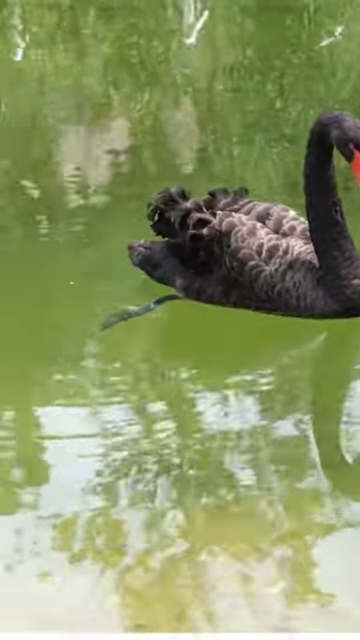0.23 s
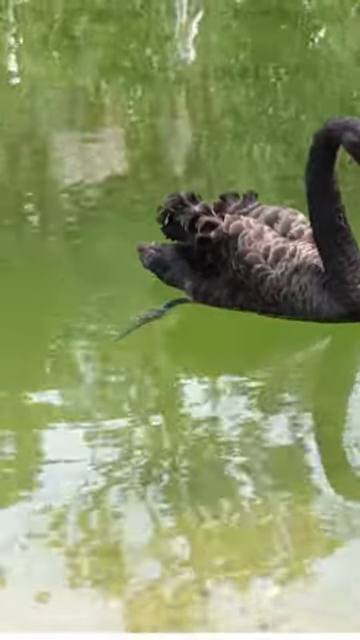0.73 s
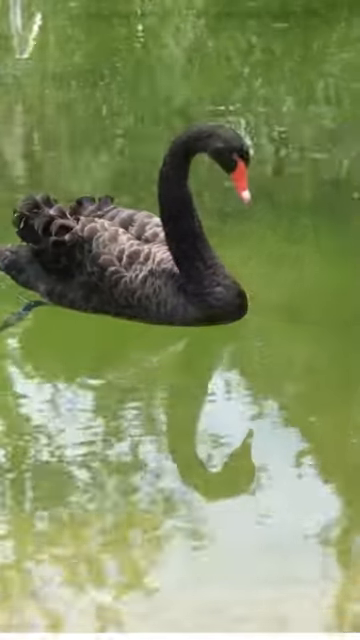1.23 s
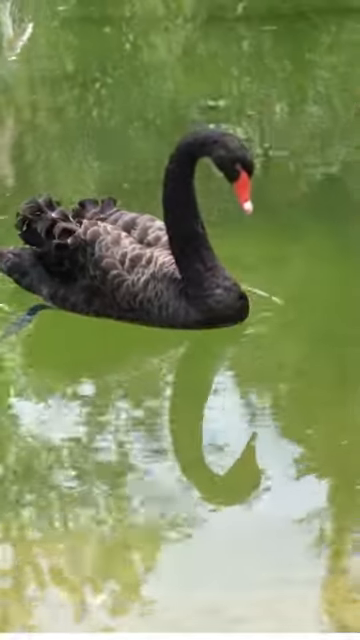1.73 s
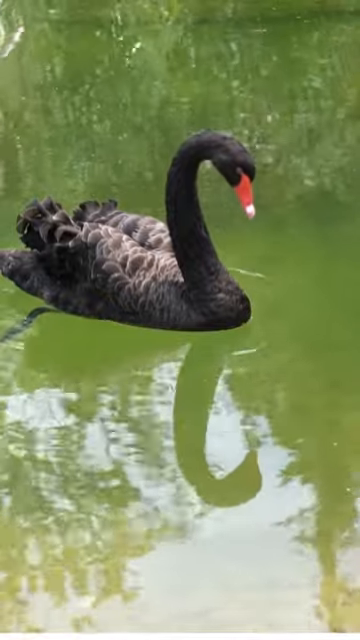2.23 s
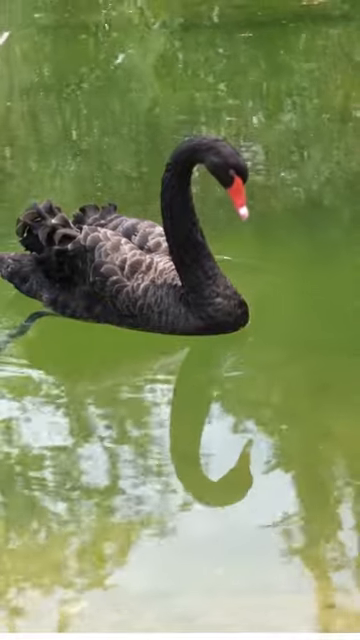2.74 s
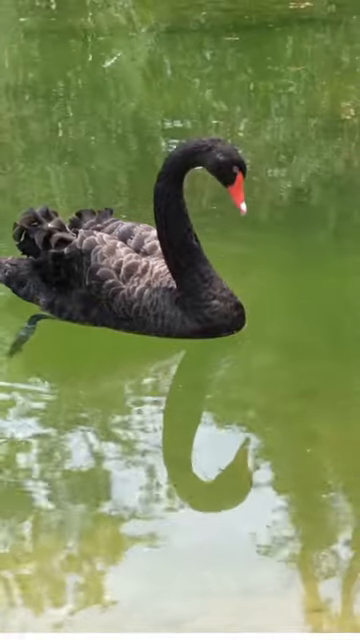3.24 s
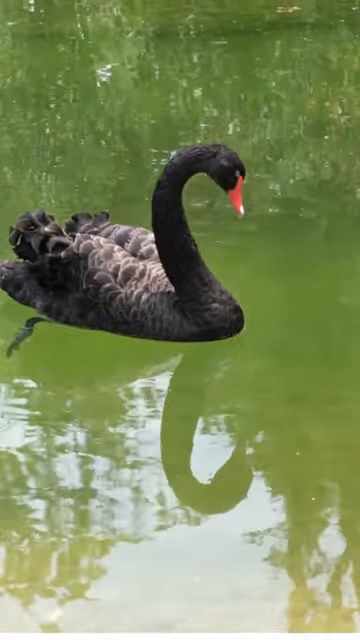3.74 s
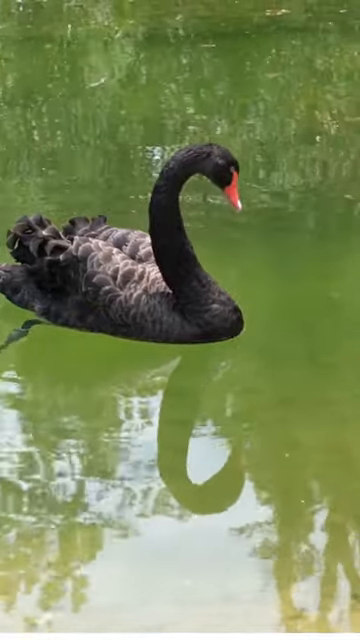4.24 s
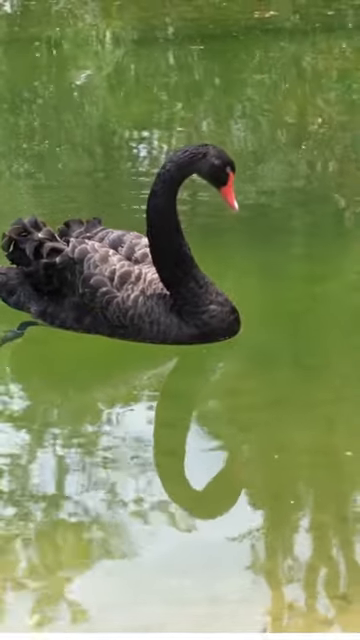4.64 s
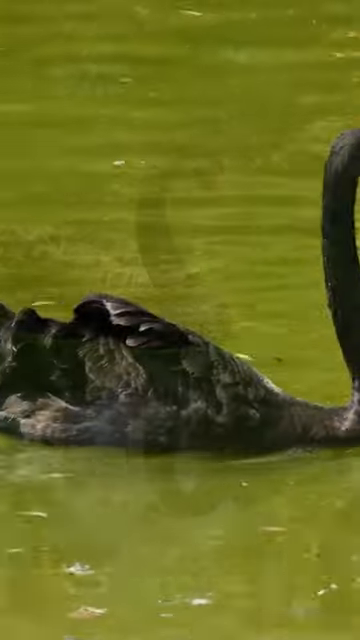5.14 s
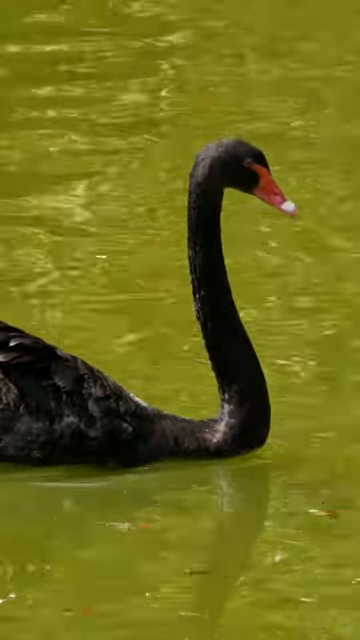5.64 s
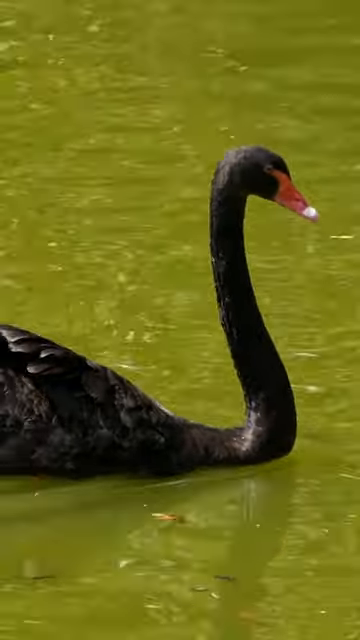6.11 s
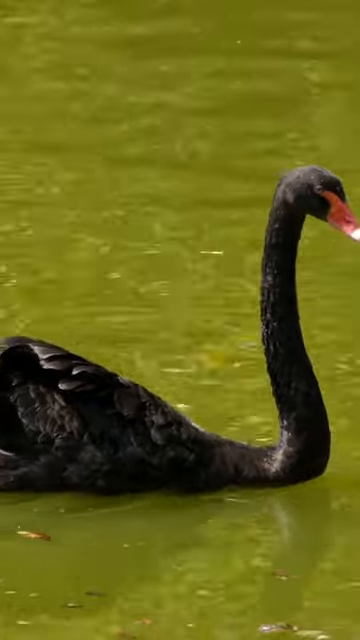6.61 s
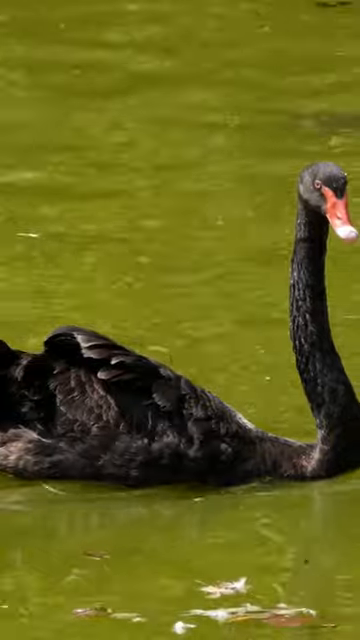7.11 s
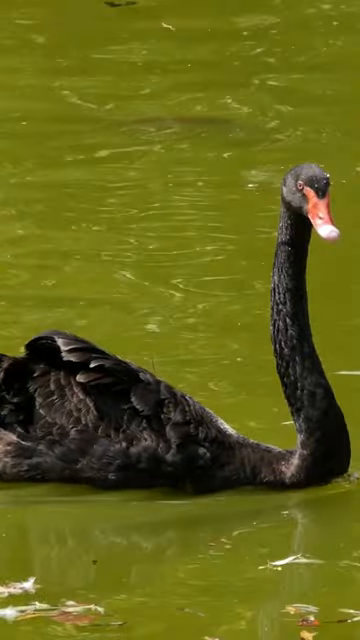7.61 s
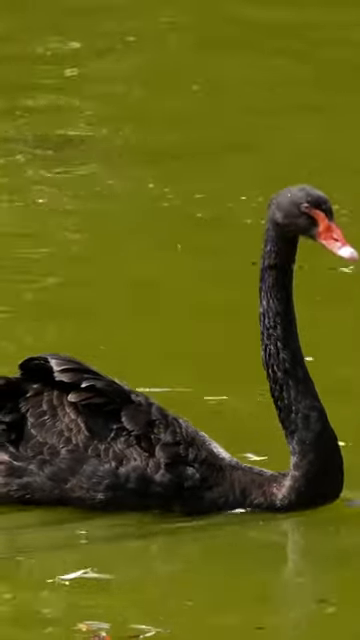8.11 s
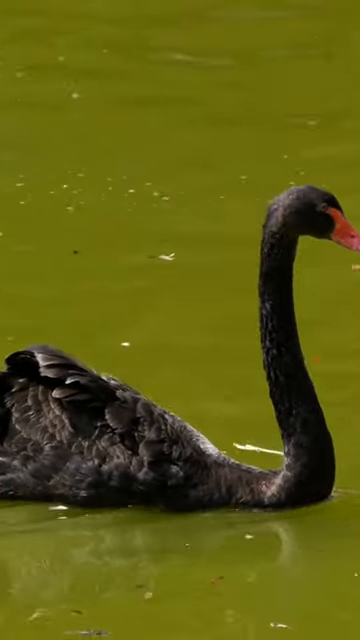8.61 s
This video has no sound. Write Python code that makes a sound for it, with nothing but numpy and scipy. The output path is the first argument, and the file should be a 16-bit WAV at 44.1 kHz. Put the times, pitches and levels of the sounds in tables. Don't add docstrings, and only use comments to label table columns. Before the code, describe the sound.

Faint outdoor hum and tiny water ticks, then a short, brassy swan call close by, nearly dry. A thin, far whistle passes, and feathers brush softly. A second, rougher call comes, followed by a quiet two-note answer from another bird farther off. After a pause, a third bugle sounds. Each call bends down and finishes on a lower note, its start slightly overloaded on a small microphone.

```python
import sys
import numpy as np
from scipy import signal
from scipy.io import wavfile
from scipy.ndimage import uniform_filter1d

SR = 44100
rng = np.random.default_rng(int(sys.argv[2]) if len(sys.argv) > 2 else 0)


def natural_amplitude(level_db):
    exponent = np.asarray(level_db, float) / 20
    return 10 ** exponent


def bounce(signal):
    frames = np.transpose(np.atleast_2d(signal))
    limited = np.clip(frames, -1, 1)
    pcm = np.round(limited * 32767).astype(np.int16)
    wavfile.write(sys.argv[1], SR, pcm)


N = 390726

# share of the time to lock, beat rate in Hz,
# its level against the first membrane in dB, level of the double-beat tone in dB.
MEMBRANE_BEATS = [(-.13, 103.7, 24, -4), (0, 103.4, 9.5, -4), (.1, 106.4, -9, -4), (.36, 103.4, -14, .3),
                  (.56, 110.8, 3.5, -23), (.8, 114, -12, -24.5), (1.11, 111.4, -39.5, -58)]
# frequency in Hz, gain in dB.
NEAR_PIPE = [(1000, -3), (1250, 3), (1600, -5.5), (2350, -0.5), (2750, -1.5), (3300, 2), (3850, -2),
             (4600, -9.5), (5200, 2), (6000, -8)]


def evened(x):
    return x / np.sqrt(np.mean(x ** 2) + 1e-20)


def read(points, hz):
    f, value = np.transpose(points)
    return np.interp(np.log(hz + 1), np.log(f + 1), value)


def curves(rows, t):
    s, *columns = np.transpose(rows)
    return [np.interp(t, s, c) for c in columns]


def add(mix, s, sound):
    part = mix[round(s * SR):][:len(sound)]
    part += sound[:len(part)]


def resonate(x, hz, width):
    return signal.lfilter(*signal.iirpeak(hz, hz / width, SR), x)


def smooth_noise(count, window):
    once = uniform_filter1d(rng.standard_normal(count), window)
    return evened(uniform_filter1d(once, window))


def voice(hz, effort_db, bright_db, beats, pipe, throat, turn_db=0, first_turn=0, fan=0.67,
          pull=0.13, pull_turn=.36, double_turn=0.083, triple=0.42, spread=0.88, back=.7,
          rasp=0.22, shiver=.2, wobble=0.0011, stumble=.05, pressed_db=18):
    # frequency in Hz, level in dB against partial 2.
    bill_colour = [(4400, -0.5), (4800, -10), (5200, -29.5), (5550, -4.5), (5700, -24), (5850, -23.5),
                   (6500, -50), (6800, -62.5), (7000, -46.5), (7400, -39), (7780, -36.5), (7950, -63.5),
                   (8150, -39), (8600, -68.5)]
    throb, double_throb = .65, .6
    notch_hz, notch_width_hz, notch_db = 4530, 42, -17
    count, levels_db = len(hz), []
    beat_hz, second_db, double_db = beats
    drift = [evened(uniform_filter1d(d, 300)) for d in rng.standard_normal((2, count))]
    flutter = smooth_noise(count, 80)
    hz = uniform_filter1d(hz, 300) * (1 + wobble * drift[0])

    second = natural_amplitude(second_db)
    double = natural_amplitude(double_db) * np.exp(2j * np.pi * double_turn)
    beat = 2 * np.pi * np.cumsum(beat_hz * (1 + stumble * drift[1])) / SR + 2 * np.pi * first_turn
    around = np.exp(2j * np.pi * np.arange(32) / 32)[:, None]
    slow = slice(0, None, 16)
    joint = 1 + second[slow] * around + double[slow] * around ** 2
    joint = joint + triple * double[slow] ** 2 * around ** 3
    fight = np.minimum(second, 1 / second)
    pair = np.minimum(abs(double), 1)
    strain = np.maximum(fight, pair)

    angle = 2 * np.pi * np.cumsum(hz) / SR + pull * fight * np.sin(beat + 2 * np.pi * pull_turn)
    angle += shiver * strain * smooth_noise(count, 160)

    out = np.zeros(count)
    for k in range(1, 9):
        n = np.arange(3 * k + 1)[:, None]
        tone_hz = k * hz[slow] + n * beat_hz[slow]
        tones = np.fft.fft(joint ** k, axis=0)[:len(n)] * natural_amplitude(read(pipe, tone_hz) * (k < 5))
        power = abs(tones) ** 2
        middle = (n * power).sum(0) / power.sum(0)
        if k > 1:
            sweep = np.exp(1j * spread / k * (n - middle) ** 2)
            tones = tones * (1 / sweep + back * (-1.) ** n * sweep)
        tones = tones / np.linalg.norm(tones, axis=0) * natural_amplitude(read(bill_colour, tone_hz) * (k > 4))
        tones = np.repeat(tones, 16, axis=1)[:, :count]
        partial = (tones * np.exp(1j * n * beat)).sum(0) * np.exp(1j * (k * angle + 0.71 * k * k))
        if k > 1:
            single_swell = throb * fight * (1 - pair) * np.cos(beat)
            partial *= 1 + single_swell + double_throb * pair * np.cos(2 * beat)
        centre_hz = k * hz + np.repeat(middle, 16)[:count] * beat_hz
        pocket_db = notch_db / (1 + (2 * (centre_hz - notch_hz) / notch_width_hz) ** 2)
        levels_db.append(effort_db + bright_db * (k - 1) ** fan + read(throat, centre_hz) + pocket_db)
        if k < 5:
            db = turn_db * (k > 3) + levels_db[k - 1]
        else:
            db = levels_db[1] + pressed_db * strain * (k > 5)
        out -= natural_amplitude(uniform_filter1d(db, 200)) * np.sqrt(2) * partial.real
    out *= 1 + rasp * strain * flutter
    return out * signal.windows.tukey(count, 600 / count)


def call(k):
    # onset in seconds, membranes lock in seconds, note closes in seconds,
    # turn of the bill in dB on partial 4, extra strength of the second membrane in dB.
    timings = [
        (2.275, 2.365, 2.575, 3.5, -1),
        (5.285, 5.405, 5.59, -.4, 5.5),
        (8.022, 8.135, 8.31, -5.5, -1),
    ]
    # time in seconds, effort in dB, brightness in dB per partial.
    breath = [
        [(2.255, -56, -2), (2.263, -36.5, -13), (2.274, -19, -.6), (2.342, -20.5, -0.83), (2.4, -31, 2),
         (2.452, -27, 1), (2.514, -32, 2.5), (2.553, -28.5, -2.5), (2.582, -43, -25)],
        [(5.265, -54, -5.5), (5.274, -36, -10), (5.288, -18, -1.5), (5.36, -20.5, -1.5), (5.416, -30, 0),
         (5.462, -23.5, -1), (5.53, -28.5, 0), (5.57, -28, -2.5), (5.597, -45.5, -37)],
        [(8.0, -58.5, -2.5), (8.011, -41, -11), (8.024, -18, 0), (8.105, -20, 2.5), (8.162, -29, 1.5),
         (8.21, -24.5, 2.5), (8.262, -27, 1), (8.291, -27.5, -1), (8.317, -51, -23.5)],
    ]
    # frequency in Hz, gain in dB.
    near_throat = [(1100, -0.5), (2130, -5), (2330, 0.5), (2700, -2.5), (3250, 2.5), (3750, 0), (4400, -7),
                   (5100, -9.5)]
    start_hz, hold_hz, sag_hz, sag_s = 1240.3, 1166, 150, .043
    overshoot_hz, overshoot_share = 54.7, 0.083
    onset, lock, close, turn_db, extra_db = timings[k]
    t = np.arange(breath[k][0][0], breath[k][-1][0], 1 / SR)
    share = (t - onset) / (lock - onset)
    hz = hold_hz + (start_hz - hold_hz) * np.maximum(1 - share, 0) - sag_hz * np.exp((t - close) / sag_s)
    hz += overshoot_hz * np.exp(-np.maximum(share + overshoot_share, 0) / overshoot_share)
    beat_hz, second_db, double_db = curves(MEMBRANE_BEATS, share)
    beats = beat_hz, second_db + extra_db, double_db
    return t[0], voice(hz, *curves(breath[k], t), beats, NEAR_PIPE, near_throat, turn_db, first_turn=.48)


def hiccup(s, length, db, bright_db):
    # share of the hiccup's length, effort in dB, brightness in dB per partial.
    hiccup_breath = [(0, -2, -14.5), (.2, 0, 0), (.45, 0, 2), (.74, -7.5, 2.5), (.87, -11, -13),
                     (1.099, -43, -26)]
    # frequency in Hz, gain in dB.
    narrow_throat = [(900, -1.2), (1860, -7.5), (2790, -14.5), (3700, -1)]
    share = np.arange(0, hiccup_breath[-1][0] * length, 1 / SR) / length
    effort_db, tilt_db = curves(hiccup_breath, share)
    hz = 950 - 86 * share ** 1.53
    locked = curves(MEMBRANE_BEATS[-1:], share)
    return s, voice(hz, db + effort_db, bright_db + tilt_db, locked, NEAR_PIPE, narrow_throat)


def answer():
    # time in seconds, pitch in Hz, effort in dB, brightness in dB per partial.
    soft_notes = [
        [(6.25, 1384, -60, -3), (6.264, 1383, -43, 0), (6.288, 1335, -40.5, 0), (6.312, 1275, -46.5, 1.5),
         (6.34, 1245, -57, -4), (6.362, 1286, -54, -14)],
        [(6.368, 1217, -54, -7), (6.384, 1227, -46.5, -2), (6.405, 1190, -46, -1), (6.42, 1192, -48.5, -9),
         (6.446, 1190, -59.5, -9), (6.52, 1195, -78, -3)],
    ]
    # time in seconds, beat rate in Hz, second membrane in dB, double-beat tone in dB.
    soft_beats = [(6.25, 106, 18, 2.5), (6.275, 107, 2, -23), (6.3, 109, -26, 0.5), (6.36, 105.5, 11, .1),
                  (6.37, 108, 1, -22), (6.4, 110, -5, -31), (6.425, 110, -14.5, -32),
                  (6.45, 110, -42.5, -61.5)]
    # frequency in Hz, gain in dB.
    far_pipe = [(1000, 10), (1350, -1), (1800, -12), (2400, -11), (3000, 3), (3600, -6), (4350, 12),
                (4750, -23), (5500, -8)]
    # frequency in Hz, gain in dB.
    far_throat = [(1300, 1), (2500, -18.5), (2900, -13), (3750, -18.5), (4300, 0), (4900, -28), (5600, -39)]
    t = np.arange(soft_notes[0][0][0], soft_notes[1][-1][0], 1 / SR)
    pitch_and_breath = curves([*soft_notes[0], *soft_notes[1]], t)
    return t[0], voice(*pitch_and_breath, curves(soft_beats, t), far_pipe, far_throat,
                       pull=0.77, back=0.39, shiver=.06, rasp=.15)


def puff(s, db, lead, hiss=0.39):
    # frequency in Hz, width in Hz, gain in dB.
    windpipe = [(1400, 147.8, 11.5), (2620, 490, 2), (4000, 370, -4), (5460, 390, -8.5), (7800, 960, -10.5)]
    t = np.arange(-.2, .1, 1 / SR)
    air = rng.standard_normal(len(t))
    tube = sum(natural_amplitude(g) * resonate(resonate(air, f, w), f, w) for f, w, g in windpipe)
    air = evened(tube + hiss * resonate(resonate(air, 4000, 4500), 3500, 4500))
    return s + t[0], air * natural_amplitude(db + np.where(t < 0, 20 * t / lead, -600 * t))


def shore(x, t60=0.22):
    t = np.arange(SR // 2) / SR
    sparse = rng.choice([-1., 1.], len(t)) * (rng.random(len(t)) < 2000 / SR)
    taps = sparse * natural_amplitude(-60 * t / t60) * (t > .008)
    return signal.fftconvolve(x, taps / np.linalg.norm(taps))[:N]


def tick(hz, snap_db, ring_s=0.001):
    t = np.arange(-.002, .006, 1 / SR)
    shape = np.exp(-abs(t) / np.where(t < 0, .0004, ring_s))
    snap = evened(resonate(resonate(rng.standard_normal(len(t)), 8200, 6900), 8000, 9000))
    return shape * (np.cos(2 * np.pi * hz * t) + 1.1 * natural_amplitude(snap_db) * snap)


def bubble(s, length, hz, octaves, db, bend=1.7, top=0.28):
    u = np.arange(0, length, 1 / SR) / length
    level_db = db - np.where(u < top, 19 * (1 - u / top), 17 * (u - top) / (1 - top))
    pitch_hz = hz * 2 ** (octaves * u ** bend)
    return s, natural_amplitude(level_db) * np.sqrt(2) * np.sin(2 * np.pi * np.cumsum(pitch_hz) / SR)


def water(faint_per_s=34, faint_db=-77):
    # time in seconds, level in dB, ring in Hz.
    clear_ticks = [(.6759, -57, 6870), (.8448, -55.5, 7600), (1.0135, -59, 5710), (1.0864, -61, 5910),
                   (1.1463, -57.5, 5230), (1.1767, -59, 5890), (1.5094, -58, 3800), (1.567, -59, 5550),
                   (1.9942, -50.5, 7150), (2.082, -56.5, 4240), (2.1186, -56.5, 5170), (2.2103, -54, 3740),
                   (3.243, -58, 3810), (3.3017, -54.5, 5600), (3.5456, -58, 4130), (3.5768, -57, 6460),
                   (3.8628, -56, 3760), (3.926, -53, 10600), (3.9605, -60, 4980), (4.0731, -58, 3810),
                   (4.2078, -57, 6750), (4.4505, -53.5, 7650), (4.7705, -59, 6720), (5.1961, -54.5, 7690),
                   (5.2292, -41.5, 7650), (7.5607, -50.5, 4200), (8.2164, -48, 8040), (8.4811, -52, 5430),
                   (8.596, -47.5, 5160), (8.649, -54, 3700)]
    # start in seconds, length in seconds, pitch in Hz, rise in octaves, level in dB.
    bubbles = [
        (1.835, .045, 151, -.1, -52.5),
        (4.895, .055, 812, 1.37, -57),
    ]
    out = np.zeros(N)
    for s, db, hz in clear_ticks:
        snap_db = -15.5 + 7 * np.log2(hz / 4000)
        add(out, s - .001, natural_amplitude(db) * tick(hz, snap_db))
    for hz in np.geomspace(4200, 10000, 12):
        hits = rng.random(N) < faint_per_s / 12 / SR
        size = natural_amplitude(faint_db + 3.2 * np.minimum(rng.exponential(1, N), 4)) * hits
        out += signal.oaconvolve(size, tick(hz, -1.5))[:N]
    for row in bubbles:
        add(out, *bubble(*row))
    return out


def rustle(s, length, hz, width, db):
    count = round(length * SR)
    grain = 1 + 0.24 * evened(uniform_filter1d(rng.standard_normal(count), 200))
    brush = resonate(resonate(rng.standard_normal(count), hz, width), hz, width)
    return s, natural_amplitude(db) * evened(brush) * grain * np.hanning(count)


def distant():
    start_s, length_s, base_hz, arch_hz, level_db = 2.94, .42, 1180, 110, -69
    u = np.arange(0, length_s, 1 / SR) / length_s
    hz = base_hz + arch_hz * np.sin(2.6 * u ** .55)
    fade = natural_amplitude(level_db - 23 * u) * np.minimum(u / 0.072, 1)
    return start_s, fade * np.sqrt(2) * np.sin(2 * np.pi * np.cumsum(hz) / SR)


def hum(patchy_db=1.42):
    # frequency in Hz, density in dB per Hz.
    hum_colour = [(18, -42), (30, -14.5), (103, 5.5), (244, -0.8), (294, -2), (353, 0.5), (645, -8),
                  (930, -6.5), (1380, -11.5), (2040, -9), (3540, -19), (4730, -27.5), (10700, -35.5),
                  (15800, -46)]
    # time in seconds, level in dB.
    hum_swell = [(0, -64), (1.4, -65), (1.9, -63), (5, -63.5), (8.86, -61)]
    frames, hz = N // 1024 + 5, np.fft.rfftfreq(4096, 1 / SR)
    a, b, patches = rng.standard_normal((frames, 2049, 3)).T
    patches = evened(uniform_filter1d(uniform_filter1d(patches, 50, 0), 3, 1))
    z = (a + 1j * b) * natural_amplitude(read(hum_colour, hz)[:, None] + patchy_db * patches)
    level_db, = curves(hum_swell, np.arange(N) / SR)
    return natural_amplitude(level_db) * evened(signal.istft(z, nperseg=4096, noverlap=3072)[1][:N])


def scene():
    # start in seconds, length in seconds, level in dB, brightness in dB per partial.
    hiccups = [
        (2.574, 0.083, -31, -1.5),
        (5.588, 0.076, -32, -2),
        (8.308, 0.089, -32.5, -1),
    ]
    # onset in seconds, level in dB, lead in seconds.
    puffs = [
        (2.27, -51.5, 0.083),
        (5.28, -48, 0.048),
        (8.015, -49, 0.071),
        (5, -75.5, .05),
    ]
    # start in seconds, length in seconds, centre in Hz, width in Hz, level in dB.
    rustles = [(0.837, 0.075, 7800, 2000, -74.5), (3.1, 0.39, 7040, 1493, -85),
               (3.423, 0.061, 4500, 900, -73.5), (3.79, 0.16, 10410, 896, -79.5),
               (5.14, 0.1, 7800, 500, -83), (7.186, 0.14, 5280, 2490, -80), (8.676, 0.065, 5710, 900, -75),
               (6.25, .08, 6500, 4000, -79)]
    near, far, lake = np.zeros(N), np.zeros(N), water() + hum()
    for k in range(3):
        add(near, *call(k))
        add(near, *hiccup(*hiccups[k]))
    add(far, *answer())
    add(lake, *distant())
    for row in puffs:
        add(near, *puff(*row))
    for row in rustles:
        add(lake, *rustle(*row))
    return (near + natural_amplitude(-47) * shore(near) + far + natural_amplitude(-28) * shore(far) + lake)[None]


def low_pass(x):
    return signal.sosfilt(signal.butter(12, 15940, fs=SR, output="sos"), x)


def record(dry):
    top, knee = .3, 14.0
    clipped = dry / (1 + abs(dry / top) ** knee) ** (1 / knee)
    clipped = signal.lfilter(*signal.butter(1, 130, "high", fs=SR), clipped)
    edge = signal.firwin(511, 15900, window=("kaiser", 9), fs=SR)[None]
    return low_pass(signal.oaconvolve(clipped, edge, "same"))


dry = scene()
out = record(dry)
bounce(out)
```